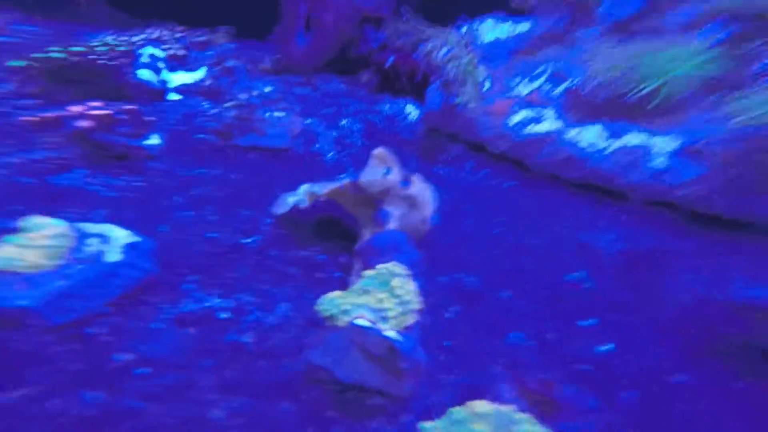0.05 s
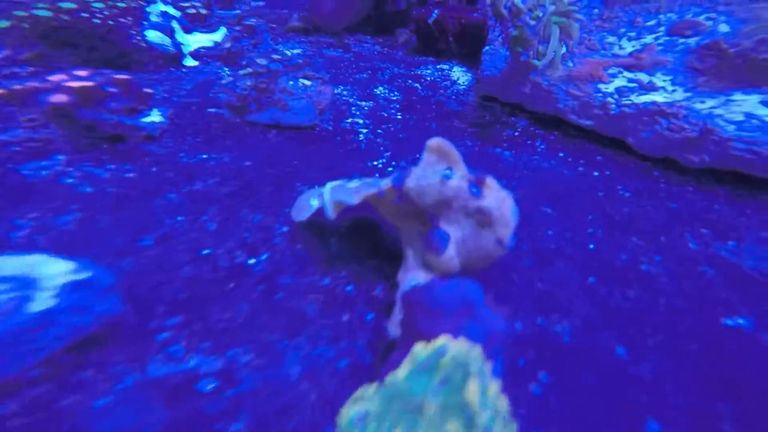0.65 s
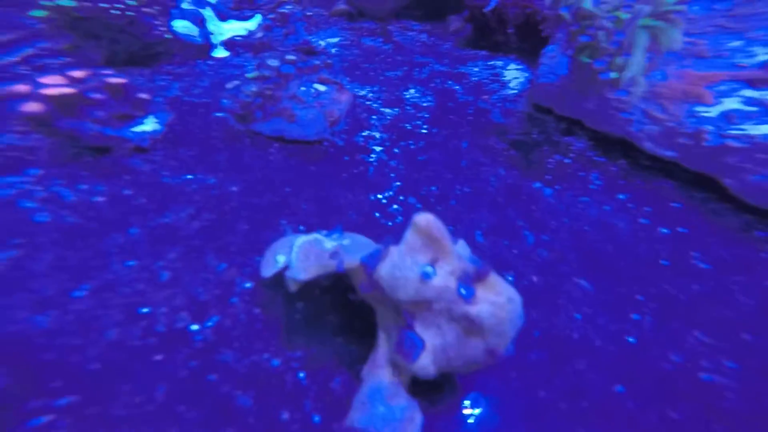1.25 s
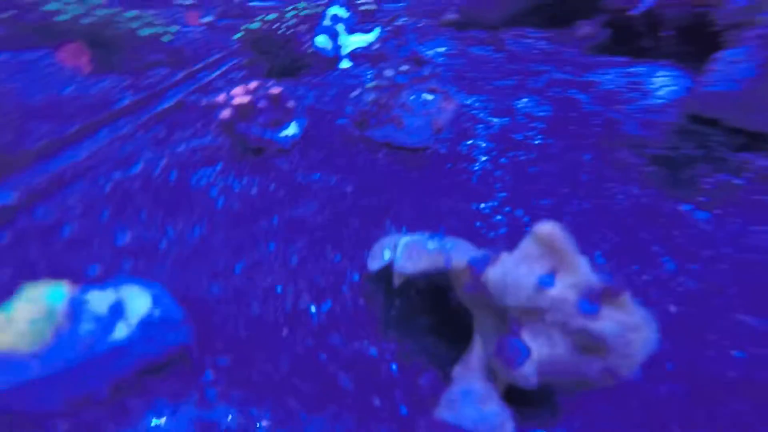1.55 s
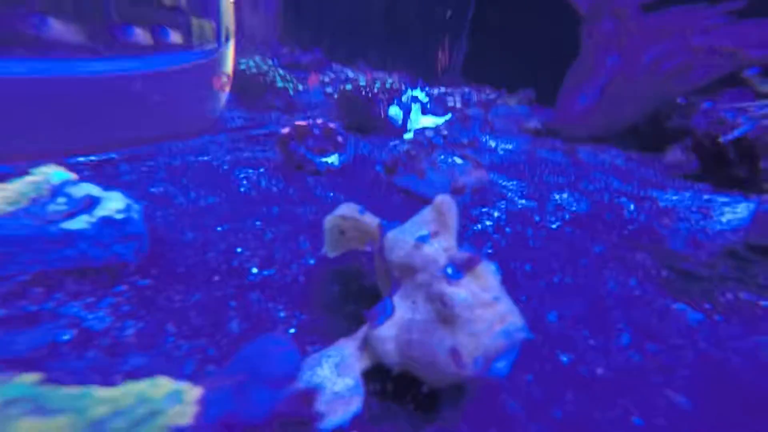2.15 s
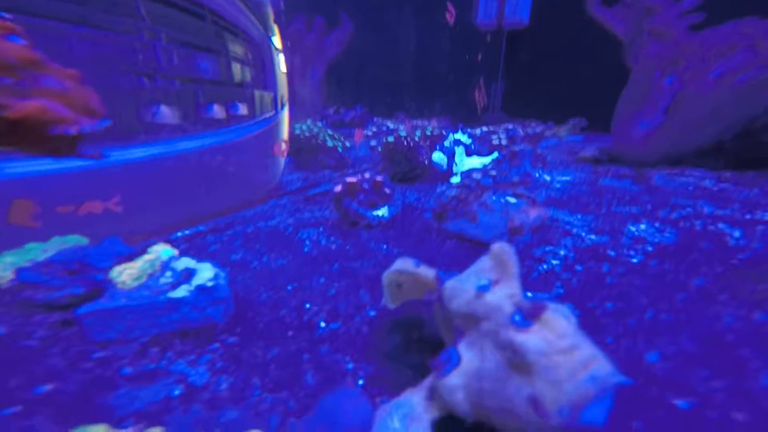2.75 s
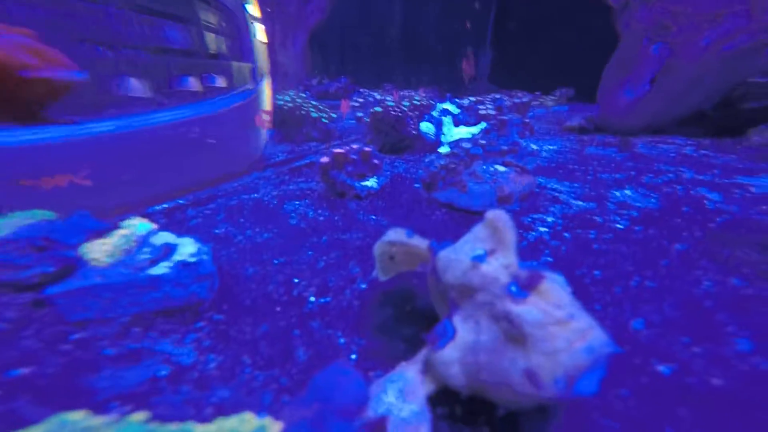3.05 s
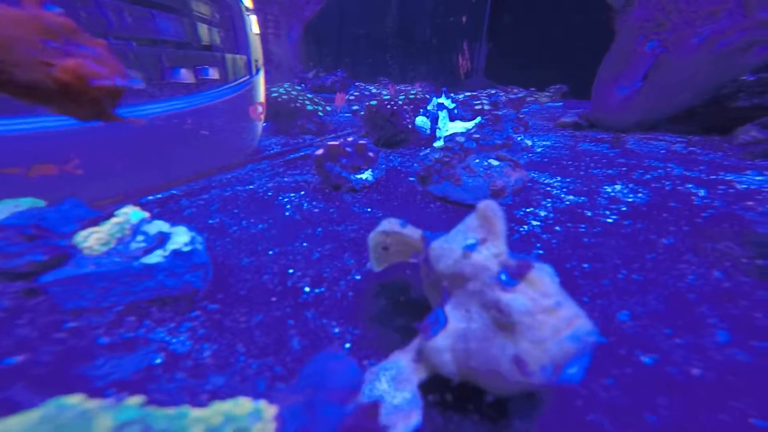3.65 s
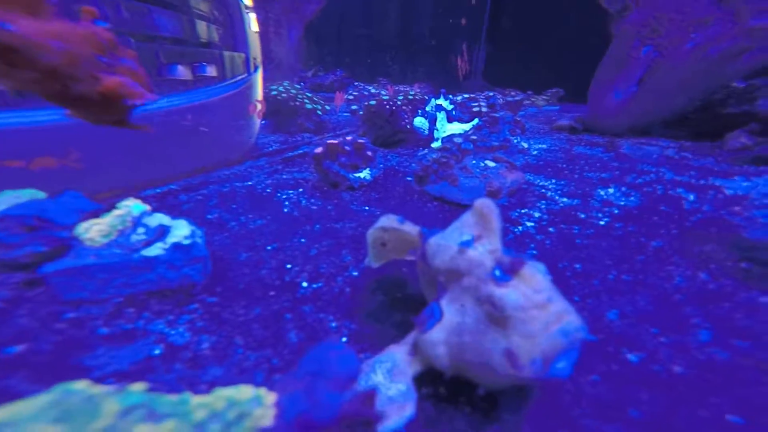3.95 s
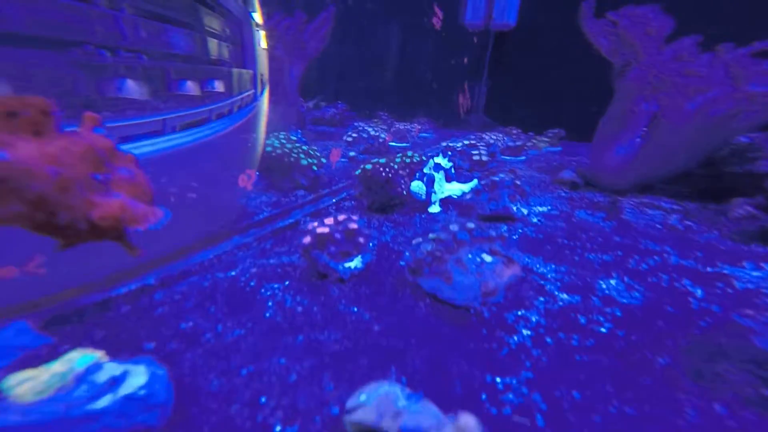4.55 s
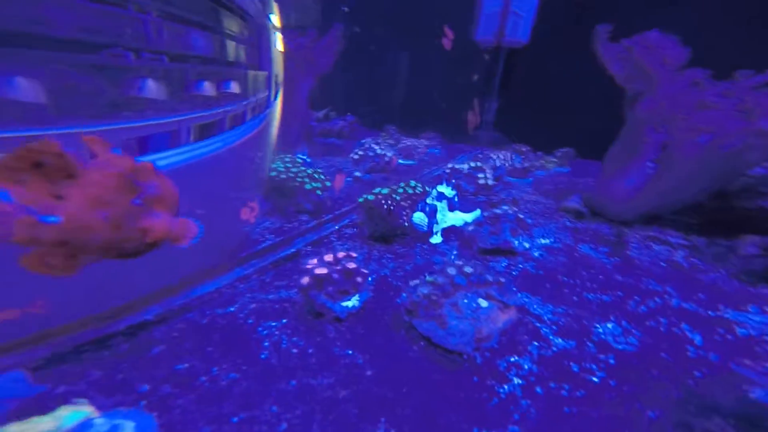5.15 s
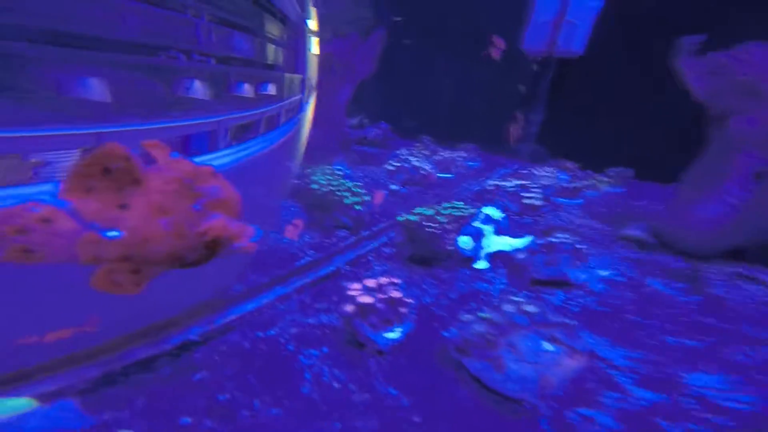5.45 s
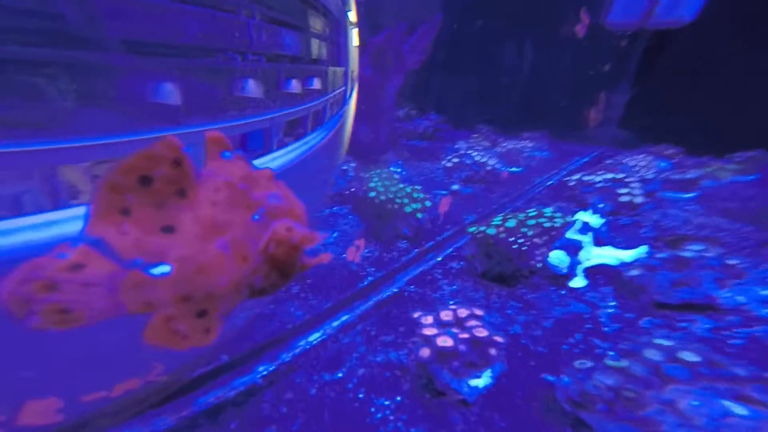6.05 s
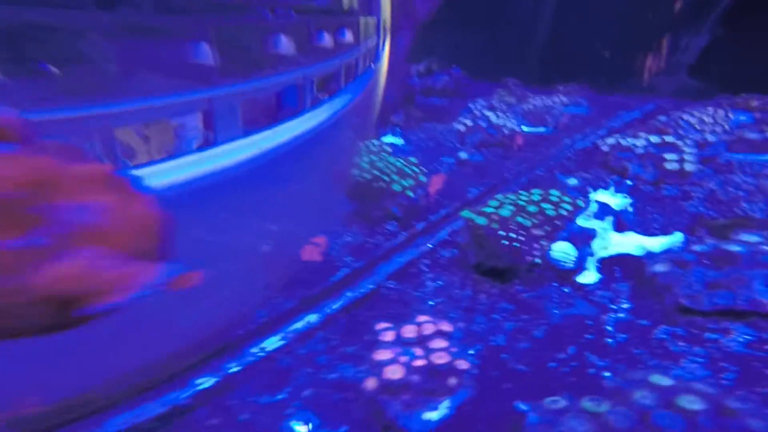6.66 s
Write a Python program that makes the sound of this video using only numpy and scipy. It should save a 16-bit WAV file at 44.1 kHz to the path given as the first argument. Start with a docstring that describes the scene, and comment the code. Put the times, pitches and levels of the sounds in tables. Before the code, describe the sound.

A submerged microphone picks up the low pulsing drone of fish tank pumps, a soft rumbling current and a light patter of small, high-pitched bubbles. A loud, close thump interrupts as its housing hits the tank, followed by lighter knocks and short gritty scrapes. The contact stops a little past halfway, and the drone and bubbling carry on.

```python
"""A throbbing hum over a low rumble, with tiny pings: a reef tank, heard by a camera under water.
Two pumps beat against each other nearly ten times a second; the current rumbles and washes.
Bubbles ring as they pinch off and tick as they burst. At 2.3 s the camera's case bumps the tank
hard, then taps and scrapes over grit for almost two seconds."""
import sys
import numpy as np
from scipy import signal
from scipy.fft import rfft, irfft
from scipy.io import wavfile

SR = 44100
rng = np.random.default_rng(int(sys.argv[2]) if len(sys.argv) > 2 else 0)


def int16_out(signal):
    """Quantize to a 16-bit WAV file."""
    q = np.round(np.clip(np.atleast_2d(signal).T, -1, 1) * 32767)
    wavfile.write(sys.argv[1], SR, q.astype(np.int16))


N = 299865
T = np.arange(N) / SR

MAINS_PUMP_HZ, FLOW_PUMP_HZ = 59.96, 27.562  # harmonics 2 and 4 beat at 9.7 Hz
IN_PHASE_S = 0.052  # both pumps push together
DRAG_FROM_S, DRAG_TO_S, DRAG_DB = 2.38, 4.1, -58.5

# Mains pump hum: harmonic, level_db
MAINS_HARMONICS = [(2, 3.5), (4, -9.5), (6, -27.5)]
# Mains pump whine: harmonic, level_db
WHINE_HARMONICS = [(10, 3.5), (12, -5.5)]
# Flow pump hum: harmonic, level_db
FLOW_HARMONICS = [(3, -7.5), (4, 0), (5, -26), (6, -23)]
# Flow pump overtones: harmonic, level_db
FLOW_UPPER_HARMONICS = [(8, -12.5), (11, -34.5), (12, -31), (16, -26)]
# Pump gains as the camera drifts: time_s, mains_db, flow_db, whine_db, overtone_db
PUMP_GAINS = [(0, -33.5, -34, -61, 1), (.7, -33.5, -34.5, -59, 1), (1.5, -37, -36.5, -56, -2),
              (2.2, -38.5, -38, -55, -1), (3, -39, -39, -56, 3), (3.8, -39, -39, -54, 3),
              (4.6, -39, -40, -59, -1), (5.3, -39, -40.5, -63, -3), (5.9, -36, -37, -61, -6),
              (6.8, -36.5, -36.5, -63, -3)]
# Rumble of the current: freq_hz, density_db
RUMBLE_SPECTRUM = [(8, -15), (18, 2.5), (38, -9), (60, -14.5), (100, -19), (200, -30), (350, -36.5),
                   (450, -38.5), (620, -35.5), (780, -42), (920, -65), (1500, -83)]
# Water washing along the case: freq_hz, density_db
WASH_SPECTRUM = [(500, -15.5), (900, -2), (1400, 2), (1750, -7), (2200, -1.5), (3200, -7.5), (6000, -29.5)]
# Background hiss: freq_hz, density_db
HISS_SPECTRUM = [(1000, 5.5), (3200, 1.5), (5700, 0), (8000, -1), (10500, -6), (13000, -3.5), (15200, -7),
                 (16000, -17.5)]
# Current gains as the camera drifts: time_s, rumble_db, wash_db
CURRENT_GAINS = [(0, 6, 5.5), (1.1, 2, 3), (2.2, 5.5, 7.5), (3.2, 1, 9), (4.1, 1, 9.5), (4.6, 0.5, 2.5),
                 (5.4, 0.5, 0), (6.8, -0.5, -2)]
# Case resonances rung by bubbles: freq_hz, level_db, t60_s
CASE_PING_MODES = [(3844, -1.5, 0.032), (4433, -7, .02), (5682, -7, 0.032), (6140, -2, 0.0093),
                   (6680, -6, 0.02), (7900, -6.5, 0.014)]
# Air breaking into bubbles: time_s, relative_rate
BUBBLE_RATE = [(0, 1.4), (.7, .8), (1.7, 1.3), (2.4, .7), (3.7, .55), (4.3, .9), (5.1, .75), (5.6, 1.6),
               (6.8, 1.5)]
# Swarms of faint bubbles: pitch_hz, log_pitch_spread, floor_db, rate_per_s
FIZZ_SWARMS = [(2200, 0.13, -64, 10), (3736, 0.054, -60.5, 12), (4403, 0.074, -63.5, 90),
               (6060, 0.093, -67, 260), (7450, 0.15, -50, 24), (11000, 0.16, -68, 76)]
# Bubbles near the camera: start_s, level_db, pitch_hz
NEAR_BUBBLES = [(0.08, -25.5, 5500), (0.284, -33, 6000), (0.3943, -35.5, 5440), (0.78, -34.5, 5200),
                (1.2188, -25, 5900), (1.3465, -33, 5260), (1.5437, -28.5, 6250), (1.675, -29.5, 7900),
                (1.688, -30.5, 6600), (1.7433, -42.5, 3780), (1.8374, -26.5, 5350), (1.9026, -33.5, 5100),
                (1.985, -46, 2030), (2.082, -47.5, 2310), (2.2586, -30.5, 6500), (2.777, -33.5, 2170),
                (2.8723, -34.5, 5540), (3.1325, -32.5, 5930), (3.3156, -23, 5610), (3.6618, -34, 6200),
                (4.025, -30, 5530), (4.1642, -31, 5630), (4.4607, -26, 5650), (4.9, -27.5, 5930),
                (5.0792, -32, 5540), (5.4766, -31.5, 6330), (5.4934, -29, 6800), (5.8634, -26, 6240),
                (5.9497, -29, 6470), (6.0728, -33, 5720), (6.1806, -28, 7270), (6.342, -25.5, 6220),
                (6.4458, -26, 7030), (6.5299, -25, 6900), (6.7294, -29.5, 6480), (6.7687, -32, 5000)]
# Loudest bursting bubbles: start_s, level_db
LOUD_POPS = [(0.1702, -34.5), (0.2214, -36.5), (1.3465, -44), (1.7998, -41), (4.7087, -43), (6.277, -42)]
# Case striking the tank: start_s, level_db, treble_db, thump_db, rebound_db
CASE_KNOCKS = [(2.2866, 1.5, -37, -8.5, -40), (2.288, 2.5, -8, 3.5, -14), (2.3408, -10, -33, -46, -15),
               (2.431, -15.5, -33, -12, -8), (2.5703, -26, -12, -60, -25), (2.8289, -17.5, -8, -56, -19),
               (2.9545, -9, 2.5, -16.5, -12), (3.175, -25, -38, -47, -7), (3.2418, -18.5, -6, -46, -27),
               (3.2724, -23, -17, -53, -4.5), (3.382, -25, -28, -46, -22), (3.808, -28, -7, -44, -2)]
# Case resonances rung by contact: freq_hz, level_db, t60_s
CASE_KNOCK_MODES = [(834, 9, 0.0066), (1061, 3.5, 0.012), (1310, 3, 0.0094), (1826, -14, 0.033),
                    (2320, -16.5, 0.035), (2570, -16.5, 0.023), (3640, -22.5, 0.042), (4740, -13, 0.013),
                    (5720, -3, 0.0055), (7840, -6.5, 0.0056)]
# Camera shaking on its mount: freq_hz, level_db, t60_s
MOUNT_MODES = [(60, 0, 0.085), (122, -7, 0.12)]
# Case wall flexing: freq_hz, level_db, t60_s
WALL_MODES = [(245, -9, 0.056), (350, -3.5, 0.035), (480, 5.5, 0.014), (590, 5.5, 0.016)]
# Strokes of the case along the tank: start_s, length_s, level_db
STROKES = [(2.304, 0.082, -33), (2.499, 0.057, -36), (2.62, 0.084, -35), (2.68, .12, -46.5),
           (2.929, 0.14, -37), (3.108, .11, -44), (3.234, 0.073, -37), (3.359, 0.3, -54.5),
           (3.52, 0.048, -40), (3.779, 0.23, -42)]
# Case rubbing on grit: freq_hz, density_db
RUB_SPECTRUM = [(400, -28), (560, -1.5), (740, 11), (930, -5), (1200, 0.5), (1650, -9.5), (2350, -3.5),
                (3100, -22.5), (3800, -11), (5000, -21.5), (5700, -18), (7200, -26), (10000, -35.5),
                (15000, -42)]


def gain(db):
    return 10 ** (np.asarray(db) / 20)


def unit_rms(x):
    return x / np.sqrt(np.mean(x ** 2) + 1e-20)


def unit_peak(x):
    return x / abs(x).max()


def add(mix, start_s, sound):
    part = mix[max(round(start_s * SR), 0):][:len(sound)]
    part += sound[:len(part)]


def curves(table):
    """Each column after time_s, interpolated per sample."""
    time_s, *columns = np.transpose(table)
    return [np.interp(T, time_s, column) for column in columns]


def butter(x, order, cutoff_hz, kind):
    return signal.sosfilt(signal.butter(order, cutoff_hz, kind, fs=SR, output="sos"), x)


def coloured(x, spectrum):
    """x filtered by a spectrum table, rms 1."""
    hz, db = np.transpose(spectrum)
    bins_hz = np.fft.rfftfreq(N, 1 / SR)
    response = gain(np.interp(np.log(bins_hz + 1), np.log(hz), db))
    return unit_rms(irfft(rfft(x) * response, N))


def drift(rate_hz):
    """Smooth random motion, rms 1."""
    bins_hz = np.fft.rfftfreq(N, 1 / SR)
    return unit_rms(irfft(rfft(rng.standard_normal(N)) / (1 + (bins_hz / rate_hz) ** 4), N))


def ring(modes, t, detune=0.):
    """Decaying sines, optionally detuned at random."""
    return sum(gain(db - 60 * t / t60_s) * np.sin(2 * np.pi * hz * (1 + detune * rng.standard_normal()) * t)
               for hz, db, t60_s in modes)


def hum(speed_hz, harmonics, waver):
    """Harmonics of a pump's speed; the current makes each waver in level."""
    phase = 2 * np.pi * speed_hz * (T - IN_PHASE_S)
    return np.sqrt(2) * sum(gain(db) * (1 + waver * drift(3.4)) * np.cos(round(k) * phase)
                            for k, db in harmonics)


def pumps(hum_swing=0.031, whine_swing=0.57):
    """Two pumps beat; the flow pump's shaft also shakes the mains pump's hum and whine."""
    mains_gain, flow_gain, whine_gain, brightness = map(gain, curves(PUMP_GAINS))
    shaft = np.cos(2 * np.pi * FLOW_PUMP_HZ * (T - IN_PHASE_S))
    mains = hum(MAINS_PUMP_HZ, MAINS_HARMONICS[:1], waver=0.079) * (1 + hum_swing * shaft)
    mains += brightness * hum(MAINS_PUMP_HZ, MAINS_HARMONICS[1:], waver=.1)
    whine = hum(MAINS_PUMP_HZ, WHINE_HARMONICS, waver=.12) * (1 + whine_swing * shaft)
    flow = hum(FLOW_PUMP_HZ, FLOW_HARMONICS, waver=.04)
    flow += brightness * hum(FLOW_PUMP_HZ, FLOW_UPPER_HARMONICS, waver=.25)
    return mains_gain * mains + whine_gain * whine + flow_gain * flow


def current(rumble_base_db=-33.5, wash_base_db=-72.5, hiss_db=-68, churn_db=0.8, wash_churn_db=1.95):
    """Moving water rumbles and washes against the case, over a steady faint hiss."""
    rumble_db, wash_db = curves(CURRENT_GAINS)
    rumble = coloured(rng.standard_normal(N), RUMBLE_SPECTRUM)
    rumble *= gain(rumble_base_db + rumble_db + churn_db * drift(6))
    wash = coloured(rng.standard_normal(N), WASH_SPECTRUM)
    wash *= gain(wash_base_db + wash_db + wash_churn_db * drift(15))
    hiss = gain(hiss_db) * coloured(rng.standard_normal(N), HISS_SPECTRUM)
    return rumble + wash + hiss


def bubble(pitch_hz, case_db, rise_s=0.00031, echo_db=-5, echo_t60_s=0.018):
    """A bubble pinches off and rings; the glass echoes it and the case rings along."""
    t = T[:SR // 20]
    t60_s = 0.0052 * (6000 / pitch_hz) ** 1.4 * rng.uniform(.6, 1.3)  # small bubbles die sooner
    onset = 1 - np.exp(-(t / rise_s) ** 2)
    ping = np.sin(2 * np.pi * pitch_hz * t) * gain(-60 * t / t60_s) * onset
    echoes = rng.standard_normal(len(t)) * (rng.random(len(t)) < .06) * gain(-60 * t / echo_t60_s)
    ping += gain(echo_db) * signal.fftconvolve(ping, echoes / np.linalg.norm(echoes))[:len(t)]
    case = signal.fftconvolve(ping, ring(CASE_PING_MODES, t))[:len(t)]
    return unit_peak(ping + gain(case_db) * case)


def birth_s(share):
    """Maps shares 0-1 of all bubbles to times, denser where bubbling is brisk."""
    rate, = curves(BUBBLE_RATE)
    born = np.cumsum(np.maximum(rate, 1e-3))
    return np.interp(share, born / born[-1], T)


def fizz(spread_db=3, case_db=-22, pitches=16, max_bubbles=4000):
    """Swarms of faint bubbles patter."""
    out = np.zeros(N)
    for pitch_hz, spread, floor_db, rate_per_s in FIZZ_SWARMS:
        pings = [bubble(pitch_hz * np.exp(spread * step), case_db)
                 for step in np.linspace(-1.7, 1.7, pitches)]
        starts_s = birth_s(rng.random(max_bubbles))
        levels_db = floor_db + spread_db * np.minimum(rng.exponential(1, max_bubbles), 4)
        for k in range(min(round(rate_per_s * N / SR), max_bubbles)):
            add(out, starts_s[k], gain(levels_db[k]) * pings[k % pitches])
    return out


def trickle(rate_per_s=9, floor_db=-41.5, range_db=10, centre_hz=6000, spread=0.081, case_db=-24):
    """Moderately loud bubbles break away in turn, uneven in timing and size."""
    out, total = np.zeros(N), rate_per_s * N / SR
    draws = rng.random((200, 2))
    pitches_hz = centre_hz * np.exp(spread * np.clip(rng.standard_normal(200), -2, 3))
    for k, (late, loud) in enumerate(draws[:int(total)]):
        start_s = birth_s((k + 2 * late) / (total + 1))
        add(out, start_s, gain(floor_db + range_db * loud) * bubble(pitches_hz[k], case_db))
    return out


def near_bubbles(trim_db=1, case_db=-25):
    """Bubbles close to the camera ping clearly."""
    out = np.zeros(N)
    for start_s, level_db, pitch_hz in NEAR_BUBBLES:
        add(out, start_s, gain(level_db + trim_db) * bubble(pitch_hz, case_db))
    return out


def pops(trim_db=-5, faint_db=-48, range_db=14, t60_s=0.034, highpass_hz=7500, count=60):
    """Bursting bubbles give short, bright ticks, most of them faint."""
    out, t = np.zeros(N), T[:SR // 20]
    faint_pops = rng.random((count, 2)) * [N / SR, -range_db] + [0, faint_db]
    for start_s, level_db in [*LOUD_POPS, *faint_pops]:
        burst = rng.standard_normal(len(t)) * np.sqrt(t) * gain(-60 * t / t60_s)
        tick = unit_peak(butter(burst, 2, highpass_hz, "high"))
        add(out, start_s, gain(level_db + trim_db) * tick)
    return out


def blow(level_db, treble_db, thump_db, crack_db=-19, crack_t60_s=.014, split_hz=2800,
         rattle_db=-19, rattle_t60_s=0.12, rise_s=0.00069):
    """A blow rings the water-damped case; a hard one cracks, a heavy one shakes the mount."""
    t = T[:SR // 5]
    contact = 1 - np.exp(-(t / rise_s) ** 2)
    crack = rng.standard_normal(len(t)) * gain(crack_db - 60 * t / crack_t60_s)
    hit = contact * (ring(CASE_KNOCK_MODES, t, detune=0.045) + crack)
    hit = butter(hit, 2, split_hz, "low") - gain(treble_db) * butter(hit, 1, split_hz, "high")
    rattle = rng.standard_normal(len(t)) * gain(-60 * t / rattle_t60_s)
    hit += gain(rattle_db) * signal.fftconvolve(hit, rattle / np.linalg.norm(rattle))[:len(t)]
    thump = gain(thump_db) * ring(MOUNT_MODES, t)
    flex = gain(thump_db) ** 2 * ring(WALL_MODES, t)  # only a heavy blow flexes the wall
    return gain(level_db) * unit_peak(hit) + contact * (thump + flex)


def knocks(first_gap_s=.0147, gap_ratio=0.43, loss_db=3, rebounds=2):
    """The case strikes the tank and rebounds, each time sooner and weaker."""
    out = np.zeros(N)
    for start_s, level_db, treble_db, thump_db, rebound_db in CASE_KNOCKS:
        add(out, start_s, blow(level_db, treble_db, thump_db))
        for k in range(rebounds):
            start_s += first_gap_s * gap_ratio ** k
            bounce_db = level_db + rebound_db - k * loss_db
            add(out, start_s, blow(bounce_db, treble_db=-31.5, thump_db=bounce_db - 28))
    return out


def rub_pressure(bite_s=0.022, ease_db=-12.5, release_s=0.024):
    """Each stroke bites, eases off and lets go, over a light drag."""
    pressure = np.zeros(N)
    drag = signal.windows.tukey(round((DRAG_TO_S - DRAG_FROM_S) * SR), .3)
    add(pressure, DRAG_FROM_S, gain(DRAG_DB) * drag)
    for start_s, length_s, level_db in STROKES:
        t = np.arange(0, length_s, 1 / SR)
        grip = np.minimum(t / bite_s, 1) * np.minimum((length_s - t) / release_s, 1)
        add(pressure, start_s, grip * gain(level_db + ease_db * t / length_s))
    return pressure


def scrapes(slips_per_s=600, grit_db=2.5, uneven_db=2.5, ring_mix=0.41, buzz_t60_s=.02,
            catch_db=12, catches=26):
    """Grit slips under the case, making it buzz and ring; coarse grains catch with a tap."""
    t = T[:SR // 20]
    slips = (rng.random(N) < slips_per_s / SR) * rng.choice([-1, 1], N)
    slips = slips * gain(grit_db * np.minimum(rng.exponential(1, N), 4))
    ringing = unit_rms(signal.oaconvolve(slips, ring(CASE_KNOCK_MODES[:6], t))[:N])
    energy = signal.oaconvolve(slips ** 2, gain(-60 * t / buzz_t60_s) ** 2)[:N]
    buzz = coloured(np.sqrt(abs(energy)) * rng.standard_normal(N), RUB_SPECTRUM)
    rub = unit_rms(buzz + ring_mix * ringing) * gain(uneven_db * drift(50))
    for start_s in rng.uniform(DRAG_FROM_S, DRAG_TO_S, catches):
        add(rub, start_s, gain(catch_db) * blow(0, treble_db=-20, thump_db=-22))
    return rub_pressure() * rub


def scene():
    """Pumps, current, bubbles and case contact, in mono."""
    tank = pumps() + current() + fizz() + trickle() + near_bubbles() + pops()
    return (tank + knocks() + scrapes())[None]


def record(dry, ceiling=.98, lowpass_hz=16000):
    """The hardest bump overloads the microphone; a low-pass follows."""
    clipped = dry / (1 + (dry / ceiling) ** 4) ** (1 / 4)
    lowpass = signal.firwin(255, lowpass_hz, window=("kaiser", 9), fs=SR)
    return signal.oaconvolve(clipped, lowpass[None], "same")


dry = scene()
out = record(dry)
int16_out(out)
```